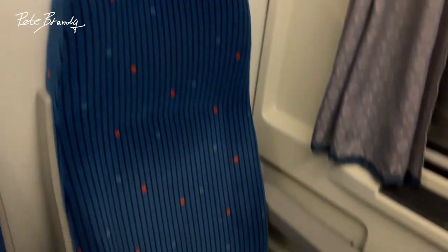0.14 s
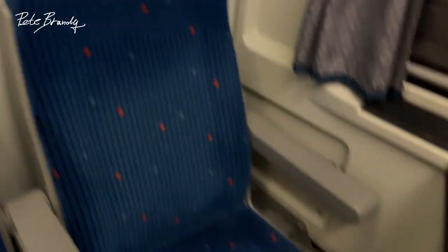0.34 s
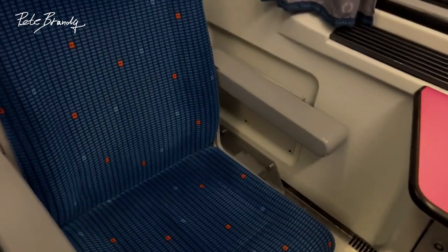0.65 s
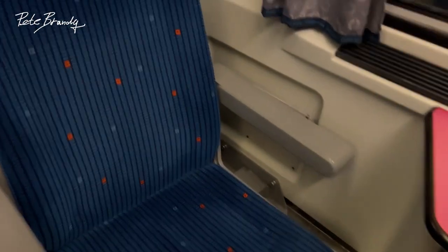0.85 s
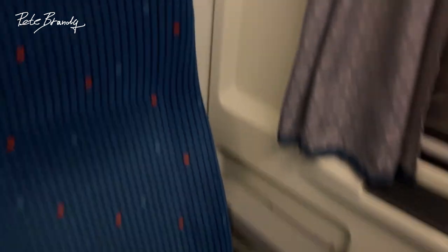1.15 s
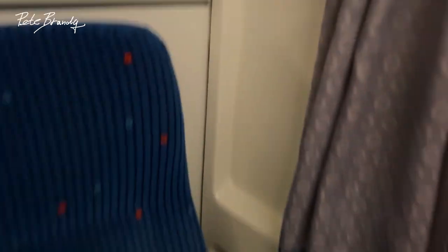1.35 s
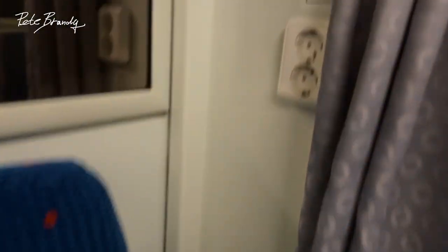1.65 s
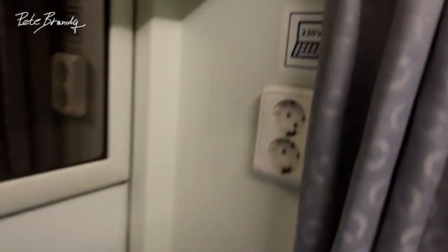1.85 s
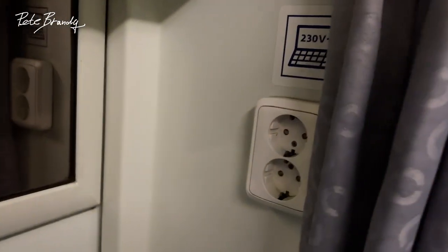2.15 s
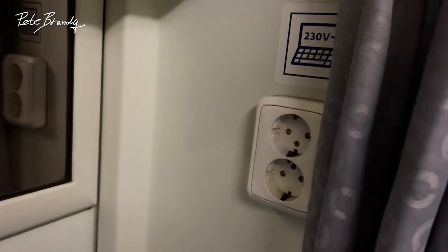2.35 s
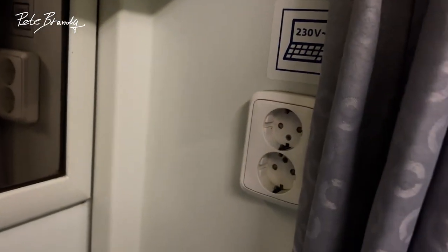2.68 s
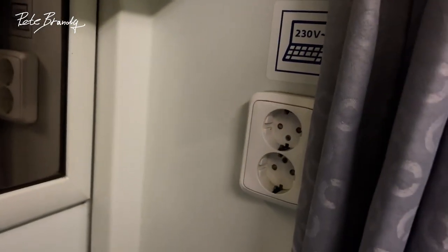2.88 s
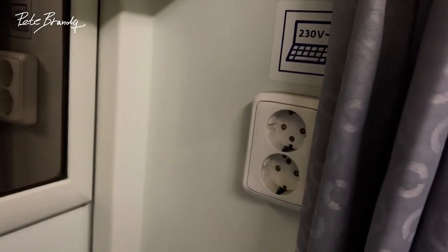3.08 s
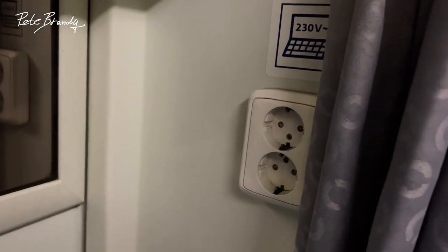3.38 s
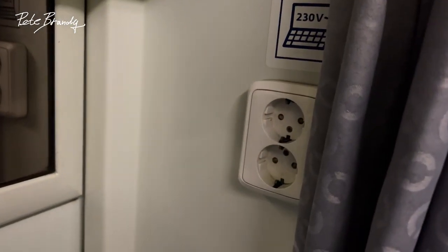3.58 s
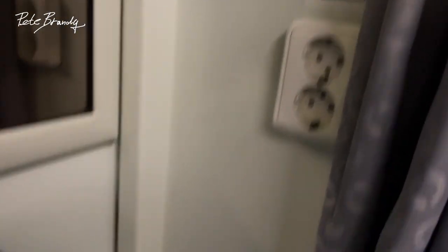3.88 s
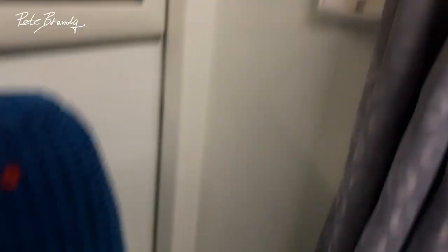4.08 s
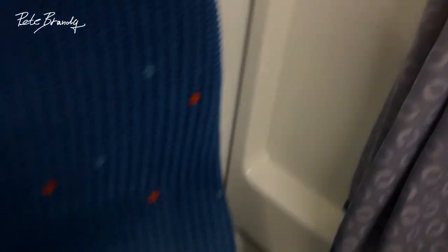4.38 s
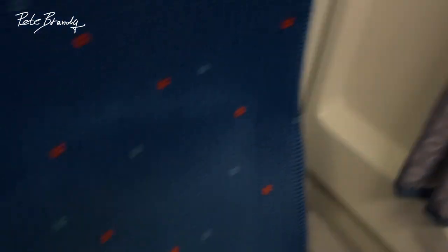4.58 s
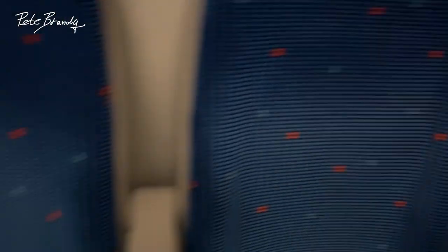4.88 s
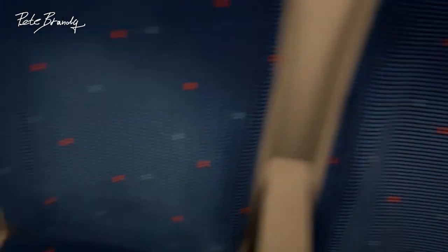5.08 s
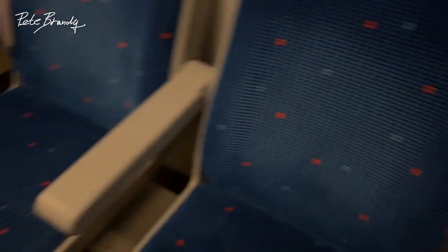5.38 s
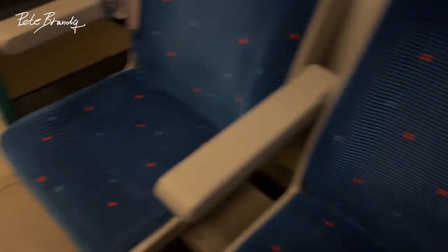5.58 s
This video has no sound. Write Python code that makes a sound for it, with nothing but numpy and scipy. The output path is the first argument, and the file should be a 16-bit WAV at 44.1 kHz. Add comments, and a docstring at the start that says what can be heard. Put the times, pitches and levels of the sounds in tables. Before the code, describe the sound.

A moving train rumbles low inside a passenger coach, with soft wheel thuds, a few faint clicks and light cloth rustling.

```python
"""Inside a rolling passenger coach, on a hand-held phone with two microphone ports. From the start the
rails shake the floor: low cabin modes boom and wheels thud over a dull roar of wheels and ventilation
and a thin machine tone. In the first two seconds the phone turns about: its case ticks, cloth rustles
and swishes close by, trim squeaks. By 2.7 s it is at the wall, almost still, and the boom has grown.
Near 4 s comes the hardest jolt and the arm stirs again; after 5 s the phone draws away from the wall."""
import sys
import numpy as np
from scipy import signal
from scipy.fft import rfft, irfft, next_fast_len
from scipy.io import wavfile
from scipy.ndimage import uniform_filter1d

SR = 44100
rng = np.random.default_rng(int(sys.argv[2]) if len(sys.argv) > 2 else 0)


def bounce(signal):
    """Save signal as a 16-bit WAV file at the path given by the first command-line argument."""
    frames = np.transpose(np.atleast_2d(signal))
    limited = np.clip(frames, -1, 1)
    pcm = np.round(limited * 32767).astype(np.int16)
    wavfile.write(sys.argv[1], SR, pcm)


N = 252687
T = np.arange(N) / SR
N_FFT = next_fast_len(N)
F = np.arange(N_FFT // 2 + 1) * SR / N_FFT + 1e-3

# the microphone's place in the cabin's standing waves: t/s, nearness to the wall/0-1
WALL_NEARNESS = [(0, 0.06), (.45, 0.32), (.7, 0), (1.5, 0.3), (2.1, 0.56), (2.65, 1), (2.95, 0.85),
                 (3.2, 1), (3.45, 0.89), (3.9, 0.84), (4.4, 0.77), (4.9, 0.79), (5.3, 0.38), (5.73, 0.24)]


def undb(db):
    """Decibels to amplitude."""
    return 10 ** (np.asarray(db) / 20)


def unit(x):
    """Scale to an RMS of 1."""
    return x / np.sqrt(np.mean(x ** 2))


def curves(table):
    """Columns of a table joined by straight lines in time."""
    times, *columns = np.transpose(table)
    return [np.interp(T, times, column) for column in columns]


def over_hz(table, hz):
    """A table of f/Hz, value read on a log-frequency axis."""
    freqs, values = np.transpose(table)
    return np.interp(np.log(hz), np.log(freqs), values)


def walk(rate):
    """Random levels held for 1 / rate seconds and smoothed twice; RMS 1."""
    hold = int(SR / rate)
    steps = np.repeat(rng.standard_normal(N // hold + 1), hold)
    return unit(uniform_filter1d(uniform_filter1d(steps, hold), hold)[:N])


def diffuse(grit=0):
    """Spectra of a diffuse noise field at the two ports; grit makes single samples stand out."""
    # likeness of the ports, swinging between opposed and alike in the top treble: f/Hz, correlation
    likeness = [(150, .96), (290, .6), (640, .2), (1400, 0), (8000, .1), (9000, -.97), (10200, -.97),
                (11000, .98), (12700, .98), (13500, -.99), (15100, -.99), (15500, .1)]
    left, other = rfft(rng.standard_normal((2, N_FFT)) * undb(grit * rng.exponential(size=N_FFT)))
    alike = over_hz(likeness, F)
    return np.array([left, alike * left + np.sqrt(1 - alike ** 2) * other])


def ring(spectrum, hz, width):
    """Noise through one resonance, applied twice for steep skirts."""
    return unit(irfft(spectrum / (1 + 1j * (F - hz ** 2 / F) / width) ** 2, N_FFT)[..., :N])


def bands(colour, gain_db, grit=0):
    """Coloured noise in half-octave bands; gain_db(hz) gives each band its own level in time."""
    low_hz, high_hz = colour[0][0] / 2, colour[-1][0]
    spectrum = diffuse(grit) * undb(over_hz(colour, F)) * (F > low_hz)
    rms = np.sqrt(np.mean(irfft(spectrum[0], N_FFT) ** 2))
    out = 0
    for step in range(int(2 * np.log2(low_hz)), int(2 * np.log2(high_hz)) + 2):
        window = np.clip(1 - np.abs(2 * np.log2(F) - step), 0, 1)
        out = out + undb(gain_db(2 ** (step / 2))) * irfft(spectrum * window, N_FFT)[:, :N]
    return out / rms


def machine_tone(hz=777.8):
    """Far back, the thin tone of some machine on board; its level wavers differently at each port."""
    # course of the tone: t/s, level/dB
    levels = [(0, -72), (.7, -68), (1, -58), (1.35, -67), (1.7, -62), (3.5, -64), (4.3, -61), (5, -63),
              (5.73, -61.5)]
    level_db, = curves(levels)
    phase = 2 * np.pi * np.cumsum(hz + .5 * walk(1.97)) / SR
    return np.array([undb(level_db + 3 * walk(6)) * np.sin(phase + .6 * walk(0.97)) for _ in range(2)])


def roar():
    """Wheels and ventilation all around: dull noise in drifting bands, coloured by the near wall."""
    # course of the roar: t/s, level/dB, tilt about 500 Hz/(dB per octave)
    course = [(0, -44.5, -0.5), (.42, -44, -0.5), (.7, -45.5, -0.5), (1.2, -46, 0.5), (1.8, -47, 1.5),
              (2.2, -45.5, -0.1), (3.2, -46, -0.5), (4, -44.5, -0.2), (4.5, -44.5, .5), (5, -45, 0),
              (5.73, -44.5, -0.8)]
    # spectrum of the roar: f/Hz, relative level/dB
    colour = [(94, -37), (160, -14.5), (270, -13.5), (303, -16), (357, -16.5), (654, -23), (698, -26.5),
              (796, -24.5), (1000, -27.5), (1280, -27), (1430, -29), (8000, -65), (10400, -93.5),
              (17600, -120)]
    # change with the microphone at the wall: f/Hz, gain/dB
    wall_colour = [(150, 11.5), (220, -1), (400, -4), (650, 2), (1600, -3.5), (3000, -0.5)]
    # narrow rings that waver inside the roar: f/Hz, width/Hz, level/dB
    whines = [(255, 40, -57), (345, 23.5, -57.5), (840, 180, -69.5), (1284, 87, -67), (2020, 380, -68)]
    level_db, tilt_db = curves(course)
    near, = curves(WALL_NEARNESS)

    def band_db(hz):
        wall_db = near * over_hz(wall_colour, hz)
        return level_db + tilt_db * np.log2(hz / 500) + wall_db + walk(2.03) + 0.95 * walk(12)

    wide = bands(colour, band_db)
    return wide + sum(undb(db + 1.2 * walk(6)) * ring(diffuse(), hz, width) for hz, width, db in whines)


def cloth_rustle(rest_db=-67, motion_db=7.5):
    """Fibres slip in dense grains close to the microphone, louder and brighter as the arm moves."""
    # movement of the arm: t/s, motion/0-1
    arm_motion = [(0, 0.43), (.8, 0.66), (1.39, 0.92), (1.7, 0.5), (2.05, 0.4), (2.3, 0.04), (3.8, 0.13),
                  (4.05, 0.7), (4.5, 0.8), (4.95, 0.44), (5.2, 0.42), (5.5, 0.97), (5.73, 0.4)]
    # spectrum of the slipping fibres: f/Hz, relative level/dB
    colour = [(1000, -18.5), (1800, 6), (3500, -1.5), (6000, -6.5), (8500, -8), (10300, -11),
              (11800, -10.5), (14000, -14.5), (16500, -16)]
    motion, = curves(arm_motion)
    level_db = rest_db + motion_db * motion + walk(24.86)  # all bands jump together
    top_db = -2.5 + 3 * motion
    return bands(colour, lambda hz: level_db + top_db * (hz > 8000) + 1.3 * walk(6), grit=0.9)


def trim_squeaks():
    """Seat and trim rub briefly: noise in one resonance swells, flickers and dies."""
    # faint squeaks, thin hisses, rasps and a groan: t/s, length/s, f/Hz, width/Hz, level/dB
    rubs = [(0.233, .08, 4200, 550, -68), (0.374, 0.16, 262, 40, -42.5), (1.188, 0.16, 6380, 450, -73),
            (1.27, .16, 5350, 900, -73), (1.484, 0.092, 3400, 900, -54), (1.544, 0.12, 5900, 900, -65),
            (1.565, 0.084, 1570, 300, -55.5), (1.84, 0.14, 5200, 1200, -65.5),
            (2.05, .085, 3300, 1500, -61), (2.058, 0.082, 1680, 900, -56), (3.53, .2, 5950, 450, -78),
            (3.7, .52, 6030, 430, -75.5), (4.06, 0.12, 1880, 500, -59), (4.109, 0.056, 1200, 600, -51.5),
            (4.31, 0.042, 4200, 900, -70), (4.36, 0.056, 1670, 160, -55.5), (4.376, 0.091, 6440, 1000, -69),
            (5.36, 0.099, 2440, 200, -63.5), (5.458, 0.22, 1790, 350, -59.5),
            (5.478, 0.079, 3730, 300, -70)]
    friction = diffuse(grit=0.65)
    flicker_db = 1.6 * walk(30)
    out = np.zeros((2, N))
    for start, length, hz, width, db in rubs:
        swell = np.sqrt(np.sin(np.pi * np.clip((T - start) / length, 0, 1)).clip(0))
        out += swell * ring(friction, hz, width) * undb(db + flicker_db)
    return out


def sleeve_swishes(brisk_db=-58, fade_db_per_s=224):
    """A sleeve slides past the microphone: bright noise opens fast, holds and fades."""
    # strokes of the sleeve: t/s, level/dB, hold/s, gain above 8 kHz/dB
    strokes = [(0.058, -60.5, .015, -11), (0.277, -70, 0.018, -3), (0.51, -66, 0.034, 0),
               (0.595, -62.5, 0.049, -3.5), (1.057, -74, 0.016, 11), (1.487, -48, 0.042, -2),
               (1.733, -69, 0.078, 3.5), (1.875, -64.5, 0.081, -0.5), (2.046, -53, 0.044, 2.5),
               (3.216, -65.5, 0.046, -4.5), (3.355, -65, 0.047, -7), (4.12, -64, .02, -24),
               (4.314, -59.5, 0.014, -7), (4.373, -62, 0.049, -4), (4.49, -71, 0.016, 1),
               (4.757, -63, 0.045, -3), (5.4, -67, 0.032, -8), (5.51, -72, .02, -5),
               (5.597, -59.5, 0.018, -5)]
    # spectrum of the sliding cloth: f/Hz, relative level/dB
    colour = [(1200, -2), (2500, -5.5), (3500, -2), (6000, -6.5), (8300, -3), (10200, -13), (11700, -4),
              (12700, -5.5), (13500, -10.5), (16500, -17.5)]
    body, top = np.full((2, N), 1e-6)
    for start, db, hold, top_db in strokes:
        rise_s = .005 + .002 * max(brisk_db - db, 0)  # soft strokes open more slowly
        fade_db = fade_db_per_s * np.clip(T - start - hold, 0, None)
        envelope = np.clip((T - start) / rise_s, 0, 1) * undb(db - fade_db)
        body += envelope
        top += envelope * undb(top_db)
    return bands(colour, lambda hz: 20 * np.log10(top if hz > 8000 else body) + 1.6 * walk(17), grit=1.4)


def case_ticks(rattle_db=-19, rattle_t60_s=.03, snap_rise_s=.00015):
    """Right at the microphone, a snap rings the phone's case, buzzes loose parts and sends a flex wave."""
    # ticks: t/s, snap drive/dB, gain of modes above 8 kHz/dB, flex level/dB, snap left minus right/dB
    ticks = [(.5165, -47, 3, -55, 8), (.522, -49, 2, -55, 10), (0.907, -45, -8, -51, 16),
             (0.9244, -25.5, -1, -40, 14), (0.9385, -33, -14, -40, 16), (1.1162, -30.5, -9, -40, 15),
             (1.262, -31, -8, -39, 15), (1.3710, -27.5, 0, -34.5, 20), (1.446, -31, -12, -46, 16),
             (1.4520, -29, -2.5, -39, 16), (2.707, -41, -7, -41, 8)]
    # modes of the case: f/Hz, relative level/dB, t60/s
    modes = [(1000, 2, 0.0074), (1490, -1, 0.0036), (2320, 4, 0.0026), (3940, 6, 0.0018),
             (5960, -0.5, 0.003), (8400, -4, 0.005), (9200, -7, .004), (12500, -11, .002)]
    t = np.arange(SR // 30) / SR
    # the bending wave arrives treble first: its pitch falls as start_hz / (1 + t / glide_s)
    start_hz, glide_s, flex_s = 1000, .0015, .011
    flex_phase = 2 * np.pi * start_hz * glide_s * np.log(1 + t / glide_s)
    flex = np.cos(flex_phase) * np.exp(-(t / flex_s) ** 2) * np.clip(t * 5000, 0, 1)
    lag = SR // 2500
    scatters = rng.standard_normal((len(ticks), len(modes)))
    rattles = rng.standard_normal((len(ticks), len(t))) * undb(rattle_db - 60 * t / rattle_t60_s)
    out = np.zeros((2, N))
    for (start, snap_db, hard_db, flex_db, pan_db), scatter, rattle in zip(ticks, scatters, rattles):
        ringing = 0
        for (hz, db, t60), stray in zip(modes, scatter):
            decay = undb(db + hard_db * (hz > 8000) + 2.2 * stray - 60 * t / t60)
            ringing = ringing + decay * np.sin(2 * np.pi * hz * (1 + 0.041 * stray) * t)
        snap = undb(snap_db) * (ringing + rattle) * np.clip(t / snap_rise_s, 0, 1) / 3
        i = int(start * SR)
        out[0, i:i + len(t)] += snap + undb(flex_db) * flex
        out[1, i:i + len(t)] += undb(-pan_db) * snap
        # the wave reaches the right port later and pushes it the opposite way
        out[1, i + lag:i + lag + len(t)] -= undb(flex_db + 1.5) * flex
    return out


def wheel_thuds(rise_s=.008, t60_s=.15, pan_db=-1.3):
    """Underfoot, a wheel meets a rail joint: the floor gives a short, heavily damped knock."""
    # knocks at the joints: t/s, level/dB, f/Hz
    knocks = [(.786, -17, 80), (.998, -22, 80), (1.196, -23, 70), (1.8, -18, 75.6), (2.044, -22.5, 93),
              (2.33, -17.5, 88), (2.7, -18.5, 96), (2.981, -15.5, 84.5), (3.357, -22, 89.4),
              (3.563, -20.5, 82.6), (3.911, -16, 70.6), (4.078, -12, 72.7), (4.125, -16, 75),
              (4.17, -14, 79.6), (4.36, -20, 85.7), (4.59, -19, 100), (4.865, -21, 70)]
    out, t = np.zeros(N), np.arange(SR // 5) / SR
    for start, db, hz in knocks:
        envelope = undb(db - 60 * t / t60_s) * np.clip(t / rise_s, 0, 1)
        i = int(start * SR)
        out[i:i + len(t)] -= envelope * np.sin(2 * np.pi * hz * t)
    return out * undb(np.array([[pan_db], [-pan_db]]) / 2)


def cabin_boom(jolt_rise_s=0.026, jolt_fall_s=0.065, side_db=-21):
    """Rail roughness drives the modes of the cabin air; the higher ones are louder near the wall."""
    # cabin modes in three groups: f/Hz, width/Hz, level within the group/dB
    low = [(24, 10, -20), (34, 12, -20), (46, 9.2, -3.5), (61.54, 13.9, -1)]
    middle = [(81.7, 13.9, 4.5), (101.56, 11.9, -1.5)]
    upper = [(121.96, 11.2, 3.5), (142, 9.1, -1.5), (167.4, 20, -12.5)]
    # low, middle and upper group: level away from the wall/dB, gain at the wall/dB, share of a jolt/0-1
    groups = [(-32, -3.5, 1), (-35, 6.5, 0.82), (-44, 10, 0.58)]
    # jolts from the track swell the boom, lulls thin it: t/s, gain/dB, length/s
    jolts = [(0.768, 3.5, 0.035), (0.854, 4, .035), (0.964, 3, 0.031), (.37, 3, .06), (1.17, 1, 0.04),
             (1.52, 2, 0.021), (1.627, 7, 0.1), (1.787, 4.5, 0.096), (1.907, 4, 0.036), (1.975, -6, .035),
             (2.324, 2.5, 0.031), (2.445, 4, 0.022), (2.593, 3, 0.06), (2.69, 3.5, 0.066),
             (2.977, 2, 0.024), (3.097, 3.5, 0.093), (3.171, 2.5, 0.046), (3.247, 6.5, 0.015),
             (3.3, -6, .04), (3.44, -1, 0.036), (3.7, -4, .03), (3.544, 2.5, 0.023), (3.802, 4.5, 0.13),
             (3.901, 5.5, 0.08), (4.049, 9.5, 0.077), (4.137, 7, 0.07), (4.275, -5, .05), (4.462, 4, 0.035),
             (4.586, 4.5, 0.074), (4.71, 4, .04), (4.844, 2, 0.21), (5.55, 3.5, 0.039)]
    near, = curves(WALL_NEARNESS)
    jolt_db = 0
    for start, db, length in jolts:
        rise, fall = (T - start) / jolt_rise_s, 1 - (T - start - length) / jolt_fall_s
        jolt_db = jolt_db + db * np.clip(np.minimum(rise, fall), 0, 1)
    side_gain = undb(side_db) * np.array([[1], [-1]])  # both ports hear nearly the same pressure
    out = 0
    for modes, (far_db, wall_db, share) in zip((low, middle, upper), groups):
        pressure = 0
        for hz, width, db in modes:
            mid, side = ring(rfft(rng.standard_normal((2, N_FFT))), hz, width)
            # a steady shaking: the mode's own swells are partly evened out
            steady = (uniform_filter1d(mid ** 2, int(SR * .06)) + 0.078) ** -.15
            pressure = pressure + undb(db) * steady * (mid + side_gain * side)
        level_db = far_db + wall_db * near + share * jolt_db + 1.32 * walk(3.3)
        out = out + undb(level_db) * unit(pressure)
    pan_db = -2.5 + 1.4 * near  # left minus right
    return out * undb(np.array([pan_db, -pan_db]) / 2)


def scene():
    """The coach and the handling noise as they reach the left and right port."""
    # a small cavity at the right port lifts the lower treble: f/Hz, gain/dB
    port_cavity = [(1500, 0.5), (3400, 3), (5500, 6.5), (6600, 4), (7500, 1)]
    air = roar() + cloth_rustle() + sleeve_swishes() + trim_squeaks()
    air[1] = irfft(rfft(air[1], N_FFT) * undb(over_hz(port_cavity, F)), N_FFT)[:N]
    return cabin_boom() + wheel_thuds() + machine_tone() + air + case_ticks()


def record(dry):
    """The phone cuts the top treble steeply."""
    cutoff_hz = 15600
    return signal.sosfilt(signal.ellip(10, .2, 80, cutoff_hz, fs=SR, output="sos"), dry)


dry = scene()
out = record(dry)
bounce(out)
```